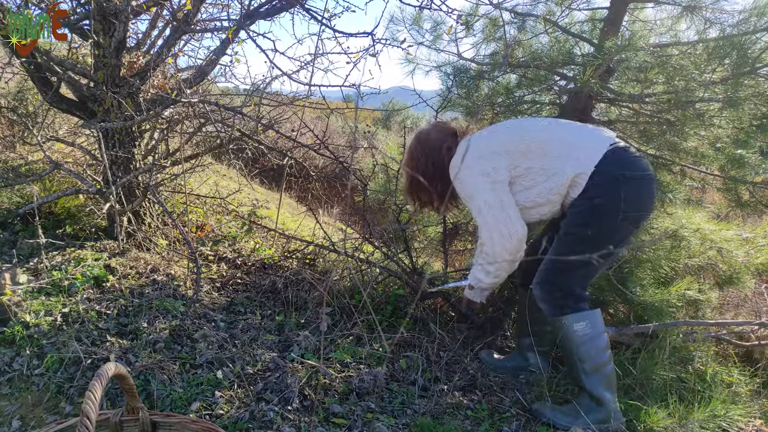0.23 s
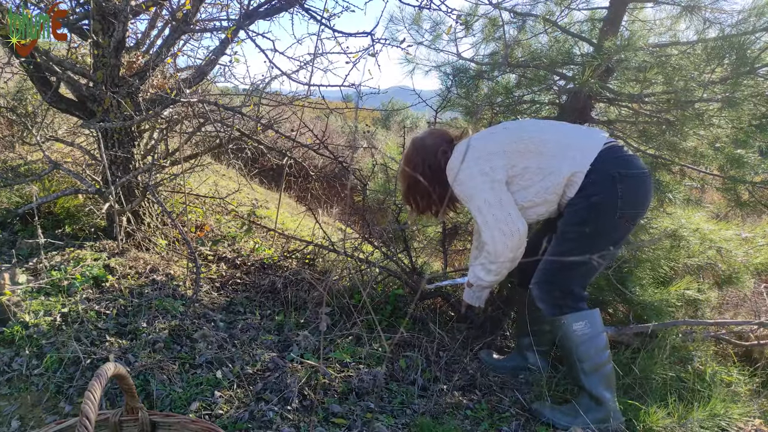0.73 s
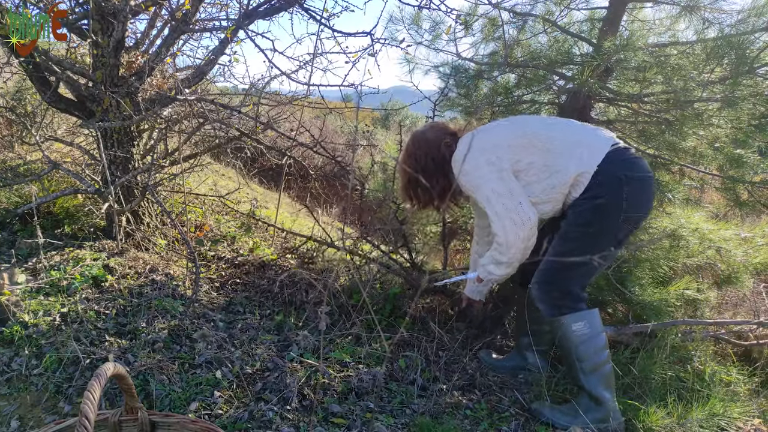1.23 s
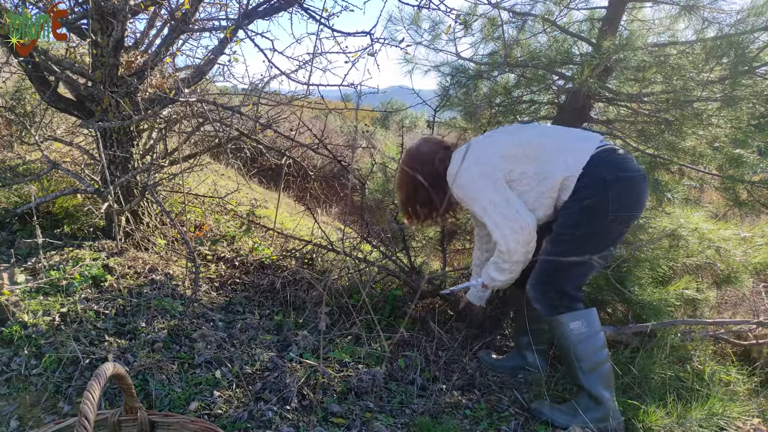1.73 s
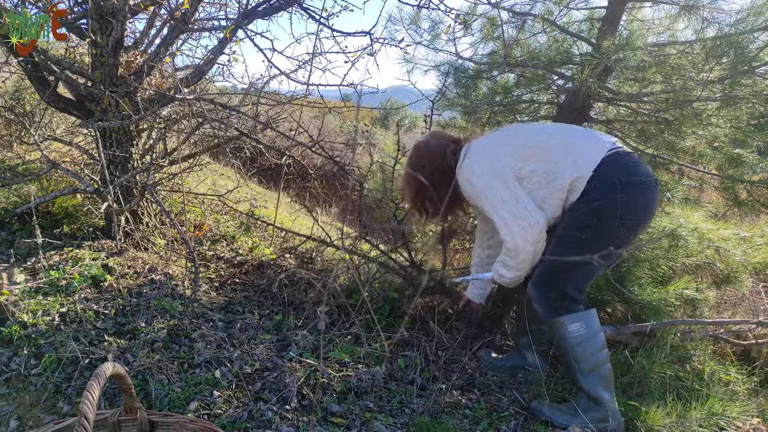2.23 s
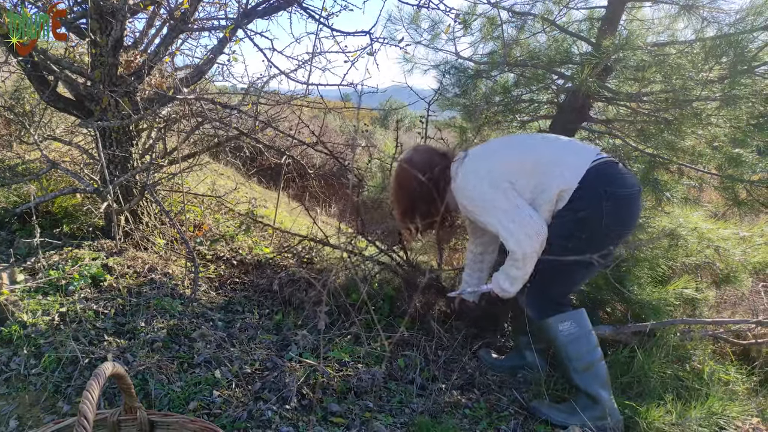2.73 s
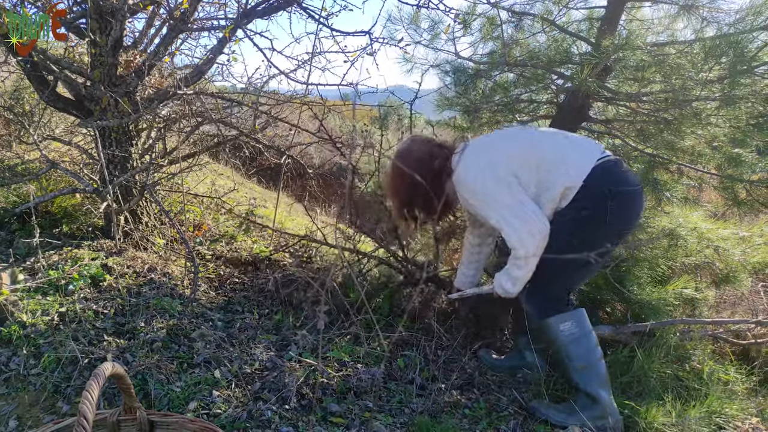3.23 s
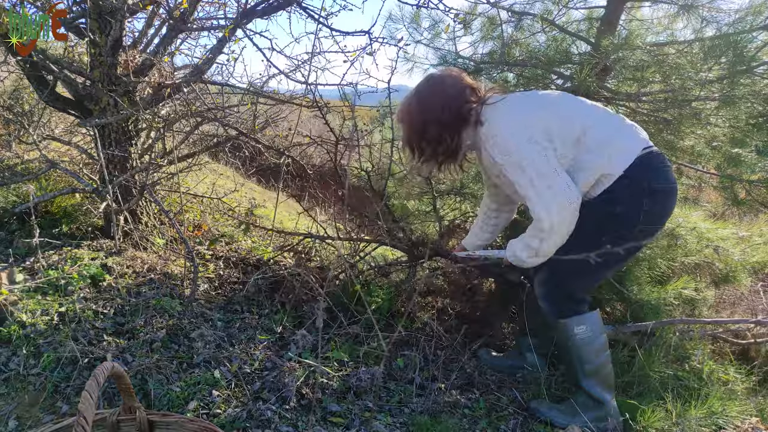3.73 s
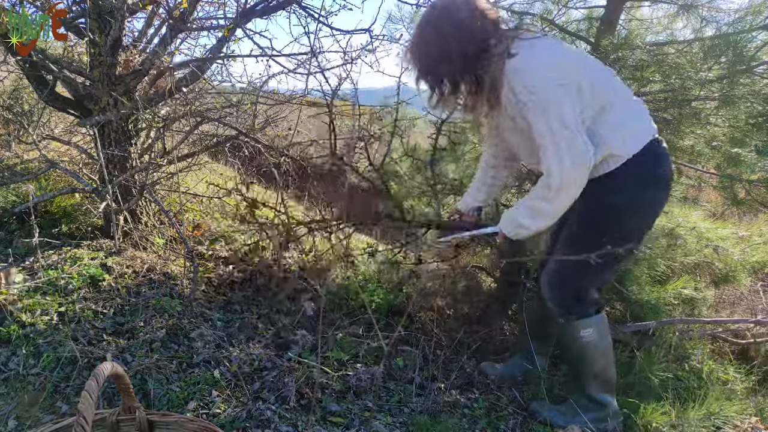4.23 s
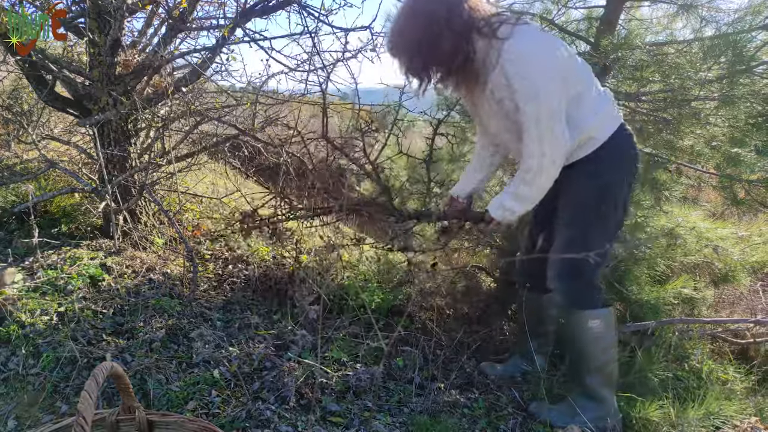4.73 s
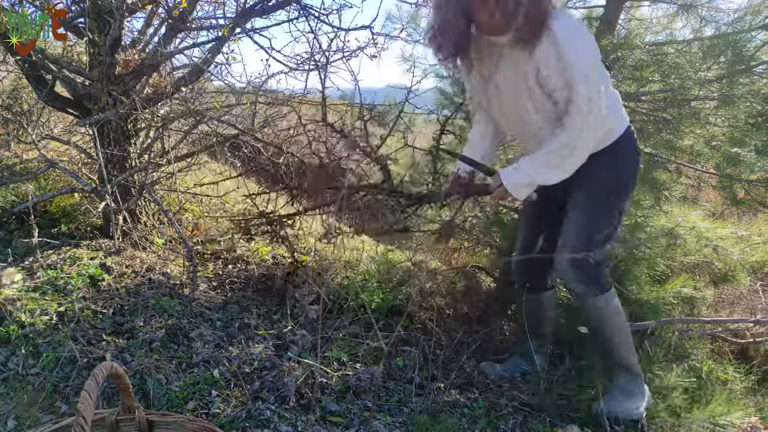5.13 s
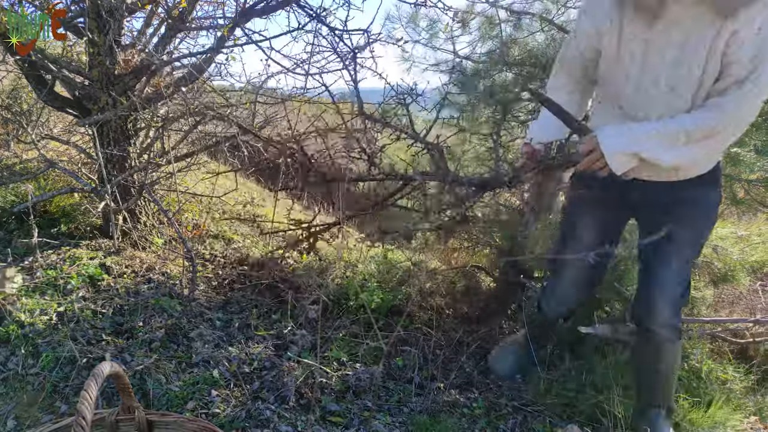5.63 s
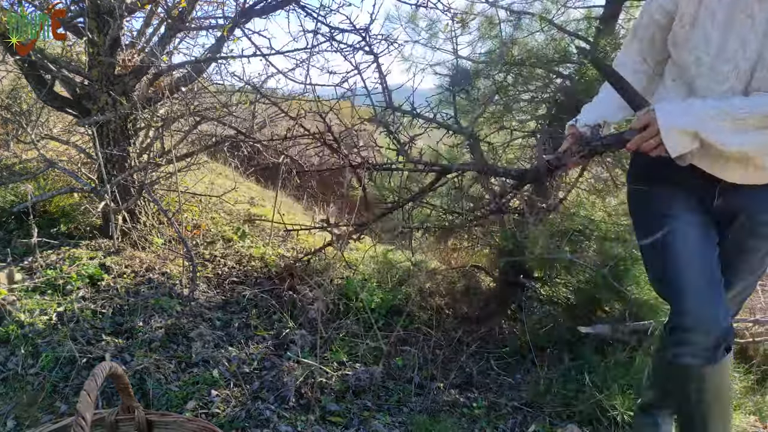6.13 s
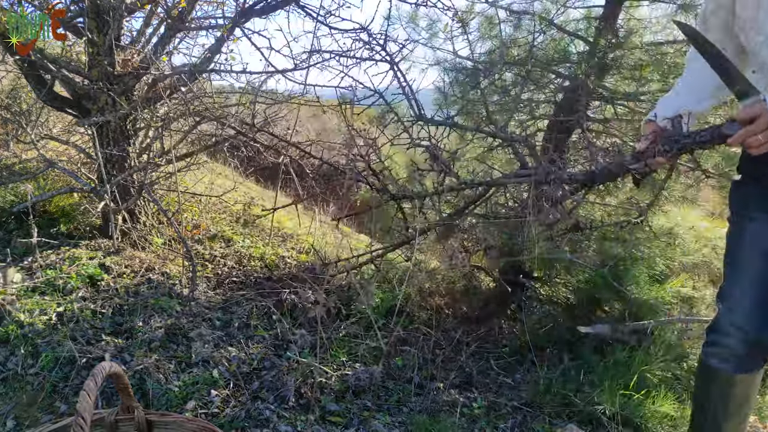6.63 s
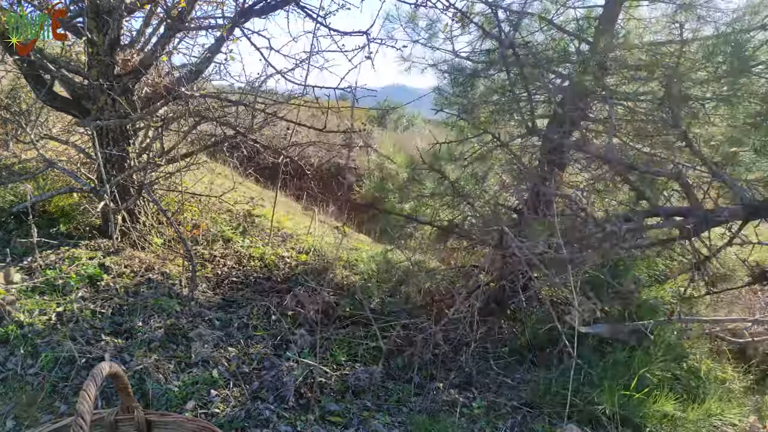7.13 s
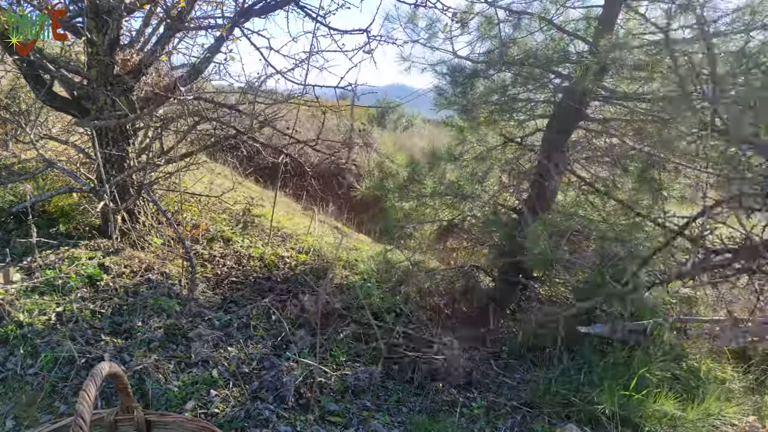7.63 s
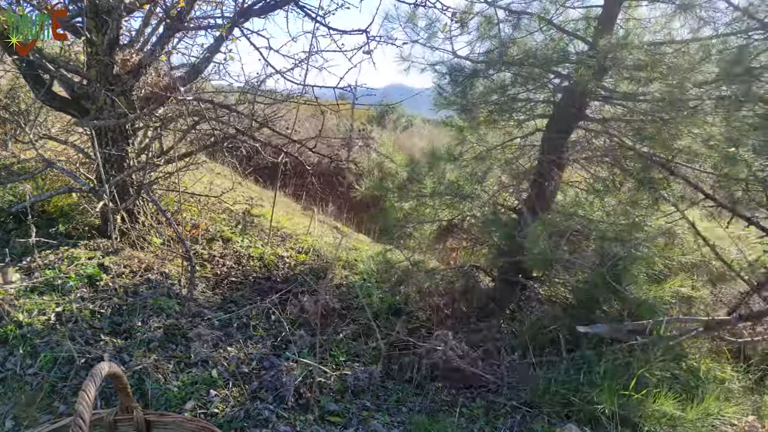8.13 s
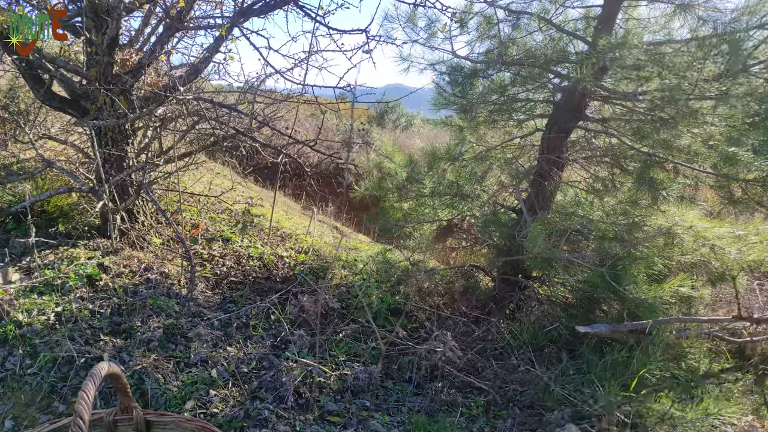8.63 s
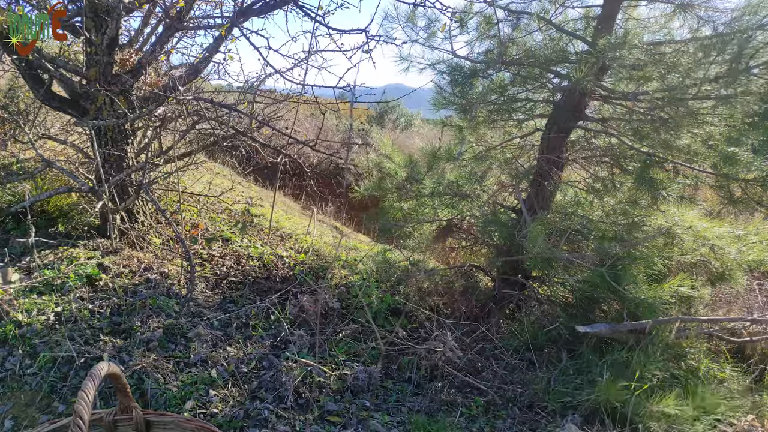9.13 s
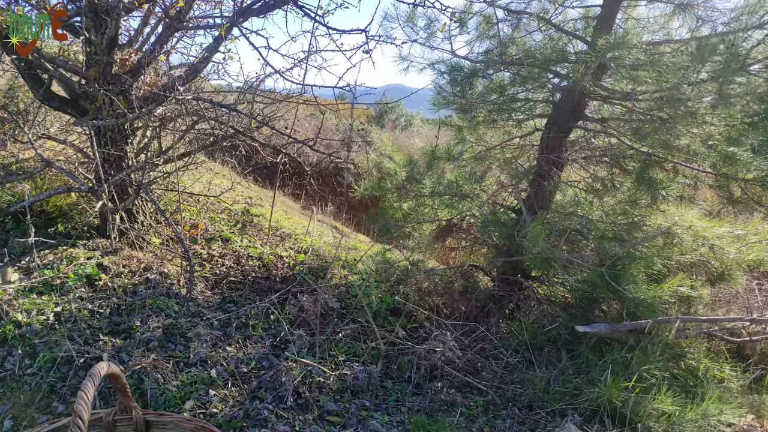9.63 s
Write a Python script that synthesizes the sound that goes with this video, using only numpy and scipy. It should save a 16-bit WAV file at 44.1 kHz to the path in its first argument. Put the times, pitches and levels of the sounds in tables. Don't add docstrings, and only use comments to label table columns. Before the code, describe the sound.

Quiet wood hush with small bird ticks, then brittle rustling, sharp twig snaps and dull wooden knocks as a dead branch is dragged away.

```python
import sys
import numpy as np
from scipy import signal
from scipy.fft import rfft, irfft
from scipy.io import wavfile
from scipy.ndimage import uniform_filter1d

SR = 44100
rng = np.random.default_rng(int(sys.argv[2]) if len(sys.argv) > 2 else 0)


def makeup_ratio(level_db):
    decades = np.asarray(level_db, float) / 20
    return 10 ** decades


def to_wav(s):
    ch = np.atleast_2d(s).T
    pcm = np.round(np.clip(ch, -1, 1) * 32767)
    wavfile.write(sys.argv[1], SR, pcm.astype(np.int16))


N = 435266
TIME = np.arange(N) / SR


def unit(x):
    return x / np.sqrt(np.mean(x ** 2))


def colour(x, table, size=2048):
    hz, db = np.transpose(table)
    bins_hz = np.fft.rfftfreq(size, 1 / SR)
    gain_db = np.interp(np.log(bins_hz + 1), np.log(hz), db)
    cepstrum = irfft(np.log(makeup_ratio(gain_db)))
    cepstrum[1:size // 2] *= 2
    cepstrum[size // 2 + 1:] = 0
    impulse = irfft(np.exp(rfft(cepstrum)))
    return signal.oaconvolve(x, impulse[None], axes=1)[:, :N]


def band(x, lo_hz, hi_hz):
    return signal.sosfilt(signal.butter(3, [lo_hz, hi_hz], "band", fs=SR, output="sos"), x)


def walk(rate_hz):
    hold = int(SR / rate_hz)
    levels = np.repeat(rng.standard_normal(N // hold + 1), hold)
    return uniform_filter1d(levels, hold)[:N]


def follow(table):
    return np.interp(TIME, *np.transpose(table))


def sides(pan_db):
    return makeup_ratio(np.array([pan_db, -pan_db]) / 2)


def scatter(x, t60_s, wet_db):
    t = TIME[:SR // 4]
    fade = np.exp(-np.log(1000) * t / t60_s) * (t > 0.002)
    tail = rng.standard_normal((2, len(t))) * fade
    tail /= np.sqrt(np.sum(tail ** 2) / 2)
    return x + makeup_ratio(wet_db) * signal.oaconvolve(x, tail, axes=1)[:, :N]


# (frequency [Hz], level [dB per Hz])
HUSH = [(15, -27), (24, 11), (110, -15), (212, -13.5), (285, -16), (677, -22.5), (840, -26.5), (3520, -36),
        (7310, -37), (9840, -47), (12200, -53), (13500, -85)]


def wood_air():
    noise = rng.standard_normal((3, N))
    shared = noise[:2] + 0.5 * noise[2]
    air = unit(colour(band(shared, 42, 20000), HUSH, size=8192))
    breeze = 0.5 * band(air, 36, 95) * walk(3.0)
    level_db = -63 + 0.5 * walk(1.4)
    return (air + breeze) * makeup_ratio(level_db) * sides(5.1)[:, None]


def clicks(at, size):
    spread_s = 0.00019
    out = np.zeros((2, N))
    lag = np.round(rng.standard_normal(len(at)) * spread_s * SR / 2).astype(int)
    np.add.at(out[0], np.clip(at + lag, 0, N - 1), size)
    np.add.at(out[1], np.clip(at - lag, 0, N - 1), size)
    return out


def grains(count, spread_db, hiss):
    size_db = spread_db * np.minimum(rng.exponential(size=count), 6.0)
    size = makeup_ratio(size_db) * rng.choice([-1, 1], count)
    ticks = unit(clicks(rng.integers(0, N, count), size))
    return ticks + hiss * rng.standard_normal((2, N))


def swell(rows):
    range_db = 10
    columns = zip(np.transpose(rows), (0, -200, 0.01, 0.01))
    s, peak_db, rise, fall = (np.clip(column, least, None)[:, None] for column, least in columns)
    t = TIME[::64]
    ramp_db = range_db * np.maximum((s - t) / rise, (t - s) / fall)
    power = makeup_ratio(2 * (peak_db - ramp_db)).sum(axis=0)
    return np.interp(TIME, t, power)


# (frequency [Hz], level [dB per Hz])
CRACKLE = [(59, -72), (100, -19), (160, -19.5), (662, -17), (970, -16), (1150, -18), (1450, -19.5),
           (1580, -17.5), (4570, -10), (6020, -8.5), (6990, 2.5), (8280, -5), (9820, -18.5), (16000, -26.5)]
# (time [s], rustle level [dB])
PULL = [(0, -70.5), (0.44, -76.5), (0.9, -68), (1.6, -69.5), (2.0, -73), (2.9, -59.5), (3.25, -49),
        (3.93, -51), (4.6, -47), (5.9, -59), (6.35, -38), (6.82, -40), (7.4, -58), (8.0, -44.5),
        (8.77, -53), (9.15, -51), (9.62, -60.5), (9.87, -73)]
# (time [s], peak level [dB], rise [s], fall [s])
TUGS = [(1.03, -51, 0.14, 0.14), (1.4, -48.5, 0.15, 0.034), (2.1, -50.5, 0.18, 0.078),
        (2.36, -46.5, 0.078, 0.051), (2.83, -46.5, 0.23, 0.047), (3.13, -45, 0.086, 0.092),
        (3.49, -51, 0.34, 0.33), (3.82, -38.5, 0.47, 0.14), (4.06, -41, 0.22, .2), (4.23, -29, 0.18, 0.14),
        (4.51, -43, 0.38, 0.032), (4.7, -38, 0.036, 0.16), (4.985, -44.5, 0.067, .05),
        (5.17, -39.5, 0.033, 0.23), (5.39, -32, 0.26, 0.33), (5.52, -33, 0.067, 0.23),
        (5.63, -32.5, 0.039, 0.14), (5.94, -45, .06, 0.088), (6.1, -31, 0.087, 0.064),
        (6.51, -38, .1, 0.08), (6.93, -33, 0.055, 0.35), (7.105, -23, 0.05, 0.046), (7.28, -33, 0.16, 0.13),
        (7.48, -33.5, 0.073, 0.22), (7.72, -35.5, 0.19, 0.11), (8.27, -37, 0.32, 0.38),
        (8.64, -41.5, 0.16, 0.092), (8.93, -37, 0.12, 0.034), (9.04, -39, 0.091, 0.079),
        (9.74, -52, 0.088, 0.046)]
# (time [s], bark level [dB], thick wood level [dB], fall [s])
GRINDS = [(3.11, -57, -57, 0.048), (4.2, -39, -67, 0.051), (4.5, -69, -50, 0.028), (4.7, -45.5, -58, 0.02),
          (5.0, -44, -51.5, 0.019), (5.17, -46, -69, 0.094), (5.39, -60, -51.5, 0.12),
          (5.62, -43, -47.5, 0.11), (5.78, -57, -54, 0.12), (5.94, -54.5, -45, 0.018),
          (6.02, -42.5, -54, 0.18), (6.155, -46, -39.5, 0.041), (6.32, -46, -52, 0.083),
          (6.51, -46, -51, .06), (6.85, -45, -49.5, 0.025), (6.92, -41, -62, 0.048), (7.1, -42, -55, .05),
          (7.48, -56, -46, .15), (8.15, -47, -52.5, 0.067), (8.66, -60, -50, .1), (9.4, -74, -60.5, 0.074),
          (9.76, -58.5, -62, 0.031)]
# (time [s], left minus right level [dB])
BRANCH_SIDE = [
    (0, -9),
    (1.9, -8),
    (6.1, -5.5),
    (7.4, -5),
    (8.45, -2),
    (8.6, -3.5),
    (9.15, 6.5),
    (9.87, 3.5),
]


def drag():
    shake = makeup_ratio(2 * follow(PULL)) + swell(TUGS)
    grind_rise_s = 0.03
    bark_grind = swell([(s, db, grind_rise_s, fall) for s, db, _, fall in GRINDS])
    wood_grind = swell([(s, db, grind_rise_s, fall) for s, _, db, fall in GRINDS])
    cleared = np.clip((TIME - 8.33) / 0.33, 0, 1)
    bark_db = -9.5 - 2.5 * cleared
    bark_gain = np.sqrt(shake * makeup_ratio(2 * bark_db) + bark_grind)
    wood_gain = np.sqrt(shake * makeup_ratio(2 * -18) + wood_grind)
    pan_db = follow(BRANCH_SIDE)
    jerk_db = 1.27 * walk(20) + 2.54 * walk(90)

    fine = colour(grains(count=30000, spread_db=1.5, hiss=0.94), CRACKLE)
    coarse = colour(grains(count=15000, spread_db=3.0, hiss=0.43), CRACKLE)
    ticks = unit(band(fine, 3280, 21000)) * makeup_ratio(2.0)
    ticks = ticks * sides(pan_db) * np.sqrt(shake)
    bark = unit(band(fine + 0.71 * coarse, 890, 5180)) * makeup_ratio(4.5 + 0.83 * walk(30))
    bark = bark * sides(0.39 * pan_db + 0.8) * bark_gain
    wood = unit(band(coarse + 0.25 * fine, 141, 1028)) * makeup_ratio(-2.33 + 3.1 * walk(22))
    wood = wood * sides(2.8)[:, None] * wood_gain
    return (ticks + bark + wood) * makeup_ratio(jerk_db)


# (time [s], peak level [dB], body
# relative level [dB])
TWIG_SNAPS = [(0.079, -43, -14), (0.2703, -55.5, -10), (0.323, -53, -15), (0.835, -51, -22),
              (1.011, -47, -3.5), (1.0665, -32, -20), (1.3435, -34, -30), (1.406, -30, -25),
              (1.949, -30, -28), (2.0134, -33, -15.5), (2.1548, -36.5, -24), (2.262, -36.5, -21),
              (2.3646, -31, -18.5), (2.519, -33, -16.5), (2.715, -31.5, -28), (2.7416, -26.5, -38),
              (2.779, -41, -14), (2.8058, -37, -25), (2.8694, -35.5, -34), (2.8964, -40, -28),
              (2.919, -31, -27), (3.0188, -30, -38.5), (3.0407, -34, -29), (3.0724, -32, -15.5),
              (3.141, -33, -2), (3.2231, -35, -8.5), (3.2857, -35.5, -12), (3.3651, -26, -23),
              (3.697, -30, -4), (3.899, -21, -23.5),
              (3.9985, -14.5, -23.5), (4.0273, -24, -16), (4.489, -22.5, -18), (4.659, -24, -18),
              (4.686, -12, -12.5), (4.926, -19.5, -17.5), (4.968, -23.5, -17), (4.9943, -16, -19.5),
              (5.1658, -11, -12), (5.4295, -24, -8), (5.6315, -15.5, -18), (5.7604, -28, -15.5),
              (5.9214, -27.5, -8), (5.995, -24, -12.5), (6.0283, -16, -24), (6.0352, -15, -16.5),
              (6.4934, -13.5, -18), (6.498, -17, -19), (6.8357, -15, -15), (6.913, -11, -14),
              (7.082, -13.5, -12), (7.5018, -23, -13.5), (7.8676, -28.5, -14.5), (8.214, -36, -5),
              (8.283, -21, -17.5), (8.3981, -31, -20), (9.008, -28, -18), (9.297, -29, -18.5),
              (9.391, -36.5, -20), (9.711, -33.5, -16)]
# (time [s], peak level [dB])
TIP_SNAPS = [(3.8252, -21), (4.0998, -28), (4.122, -14), (4.256, -18.5), (5.2116, -28), (5.374, -20),
             (5.518, -18), (5.8517, -31), (6.0788, -18), (4.983, -23), (4.941, -20.5), (6.7005, -23.5),
             (7.0147, -19), (7.062, -21), (7.212, -16.5), (7.234, -18), (7.2546, -9.5), (7.283, -30),
             (7.472, -19.5), (7.6712, -25), (7.7158, -20.5), (8.259, -26), (8.465, -21), (8.489, -27),
             (8.6192, -9), (8.815, -29), (8.8438, -20), (9.0374, -18), (9.1452, -29), (9.834, -45)]


def snaps():
    tips, body = np.zeros((2, 2, N))
    t = TIME[:SR // 10]
    split = makeup_ratio(-3.5 * 1000 * t)
    debris = makeup_ratio(-20.5 - 0.56 * 1000 * t)
    fade = (split + debris) * (1 - np.exp(-t / 0.00028))
    crack_s, crack_db = 0.00066, 10.5
    thin = [(s, peak_db, -31) for s, peak_db in TIP_SNAPS]
    for s, peak_db, body_db in TWIG_SNAPS + thin:
        draw = rng.standard_normal((4, len(t)))
        fibres = (draw[0] + 1.78 * draw[1:3]) * makeup_ratio(0.7 * draw[3])
        fibres[:, int(crack_s * SR)] += makeup_ratio(crack_db)
        i = int(s * SR)
        burst = (fibres * fade * makeup_ratio(peak_db))[:, :N - i]
        tips[:, i:i + len(t)] += burst
        body[:, i:i + len(t)] += burst * makeup_ratio(body_db)
    tips = colour(tips, CRACKLE)
    air = makeup_ratio(1.5) * band(tips, 9450, 15800)
    tips = makeup_ratio(3.0) * (band(tips, 5860, 12500) + air) * sides(follow(BRANCH_SIDE))
    return tips + makeup_ratio(19.5) * band(colour(body, CRACKLE), 970, 3600)


# (time [s], peak level [dB])
TICKS = [
    (0.4888, -47),
    (0.515, -42.5),
    (0.6651, -45),
    (0.6925, -43),
    (1.6716, -43),
    (1.701, -38.5),
    (1.8076, -42.5),
    (1.8413, -38.5),
]
# (time [s], pitch [Hz], level [dB])
WHISTLES = [
    [(1.84, 3970, -83), (1.928, 5100, -72), (1.96, 4373, -75)],
    [(9.565, 4250, -73), (9.615, 5120, -74), (9.645, 4650, -88)],
]


def birds():
    ticks, whistle = np.zeros((2, N))
    top_hz, end_hz, glide_s = 8300, 4150, 0.0037
    for s, peak_db in TICKS:
        t = np.maximum(TIME - s, 0)
        hz = end_hz + (top_hz - end_hz) * np.exp(-t / glide_s)
        envelope = (1 - np.exp(-t / 0.001)) * np.exp(-t / 0.004)
        ticks += makeup_ratio(peak_db + 5.0) * envelope * np.sin(2 * np.pi * np.cumsum(hz) / SR)
    ticks = colour(ticks[None], CRACKLE)[0]
    for call in WHISTLES:
        s, hz, db = np.transpose(call)
        edge = np.clip(np.minimum(TIME - s[0], s[-1] - TIME) / 0.0054, 0, 1)
        phase = 2 * np.pi * np.cumsum(np.interp(TIME, s, hz)) / SR
        whistle += edge * makeup_ratio(np.interp(TIME, s, db) + 15.0) * np.sin(phase)
    near = scatter(ticks * sides(6.9)[:, None], t60_s=0.034, wet_db=2.5)
    far = scatter(np.array([whistle, 0.88 * whistle]), t60_s=0.03, wet_db=-4.0)
    return near + far


# (time [s], peak level [dB], pitch [Hz], fade [dB per ms])
KNOCKS = [(3.137, -34, 500, 1.5), (3.525, -46, 398, 2), (3.939, -31.5, 365, 3.5), (4.121, -27.5, 352, 2),
          (4.188, -31, 719, 2.3), (4.353, -35.5, 452, 1.5), (4.491, -48, 630, 1.2), (4.687, -47, 743, -0.5),
          (4.927, -40.5, 600, 0.6), (5.167, -29, 780, 1.3), (5.382, -40.5, 418, 0.8), (5.526, -49, 268, 0),
          (5.679, -31, 711, 3.5), (5.918, -41, 465, 1.5), (5.994, -43, 500, 0), (6.129, -31, 420, 0.35),
          (6.498, -34, 468, 2.5), (6.846, -37.5, 185, 0.5), (6.918, -38, 714, 0.3),
          (7.016, -43.5, 245, 0.2), (7.087, -39, 649, 1), (7.47, -39.5, 180, 1), (8.433, -53, 493, -1.7),
          (8.636, -31, 332, 0.5), (8.788, -32, 480, 2), (8.89, -42.5, 523, 0.8), (9.33, -44, 550, 1),
          (9.362, -42, 614, 0.8)]


def knocks():
    out = np.zeros(N)
    t = TIME[:SR // 4]
    for s, peak_db, hz, fade_db in KNOCKS:
        draw = rng.random((2, 12))
        pitch = 150 * 6.1 ** ((np.arange(12) + draw[0]) / 12)
        delay_s = 0.01153 * draw[1] * 300 / pitch
        late = np.maximum(t - delay_s[:, None], 0)
        fade_db_s = 1000 * max(fade_db, 0.15) * np.sqrt(pitch / 400)
        modes = np.sin(2 * np.pi * pitch[:, None] * late) * makeup_ratio(-fade_db_s[:, None] * late)
        weight = makeup_ratio(-7.0 * np.abs(np.log2(pitch / hz)))
        hit = weight @ modes * (1 - np.exp(-t / 0.0021))
        i = int(s * SR)
        out[i:i + len(t)] += (makeup_ratio(peak_db - 10.5) * hit)[:N - i]
    return out * sides(3.0)[:, None]


def scene():
    branch = scatter(drag() + snaps() + knocks(), t60_s=0.028, wet_db=-22.0)
    return wood_air() + branch + birds()


def roll_off(x):
    return signal.sosfilt(signal.butter(12, 16050, fs=SR, output="sos"), x)


def record(dry):
    mix = signal.sosfilt(signal.ellip(8, 0.2, 70, 16050, fs=SR, output="sos"), dry)
    return roll_off(mix)


dry = scene()
out = record(dry)
to_wav(out)
```